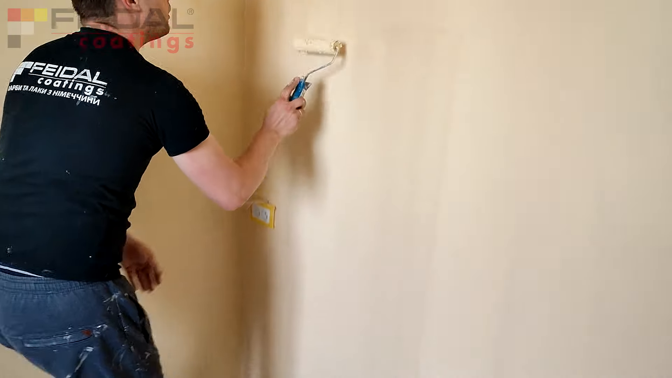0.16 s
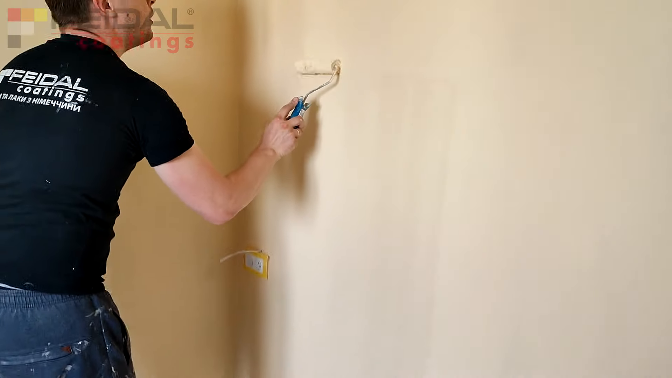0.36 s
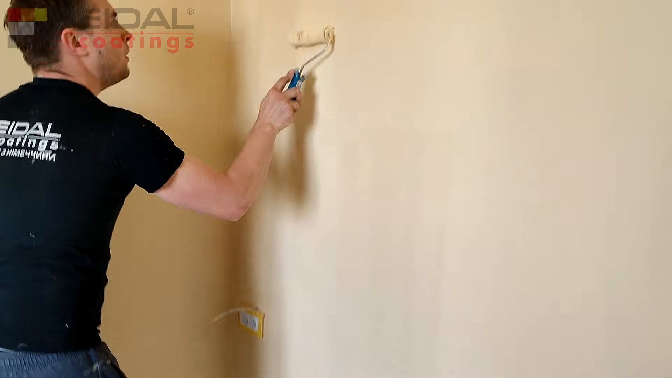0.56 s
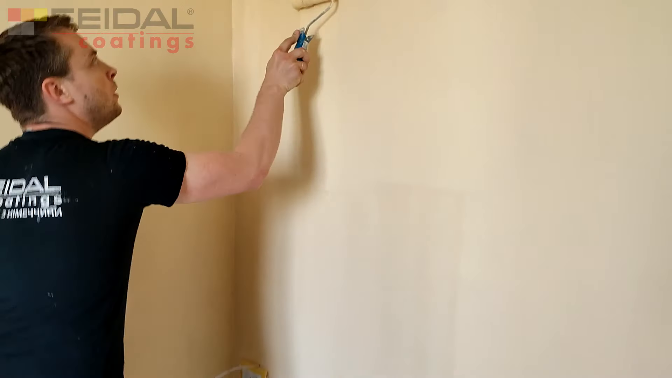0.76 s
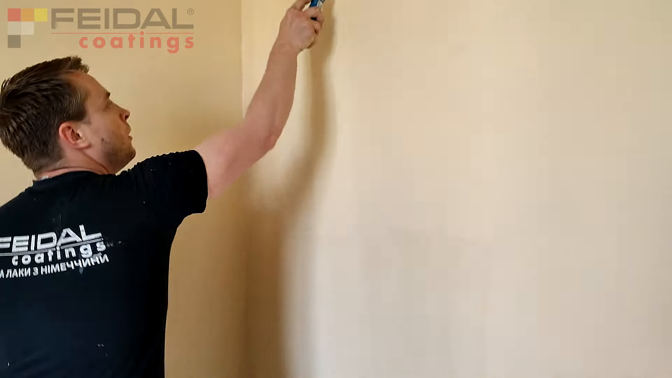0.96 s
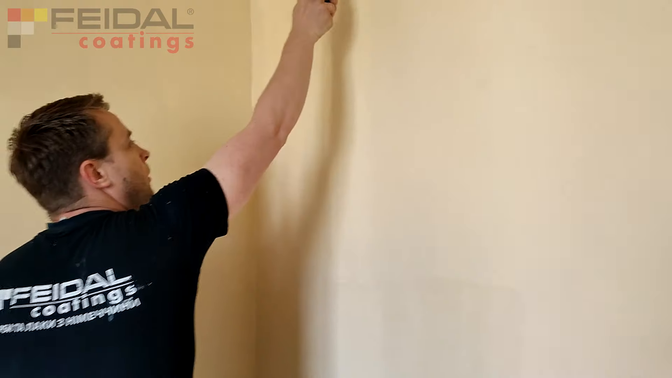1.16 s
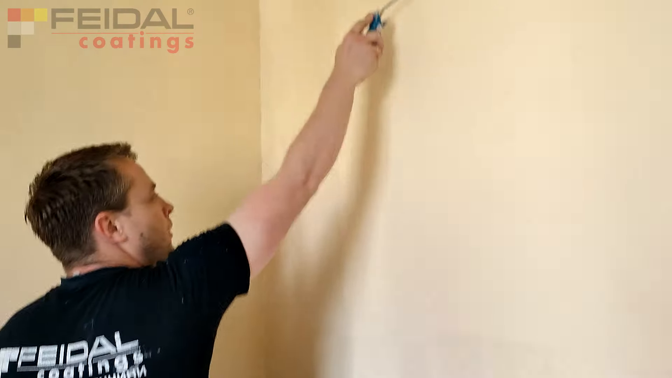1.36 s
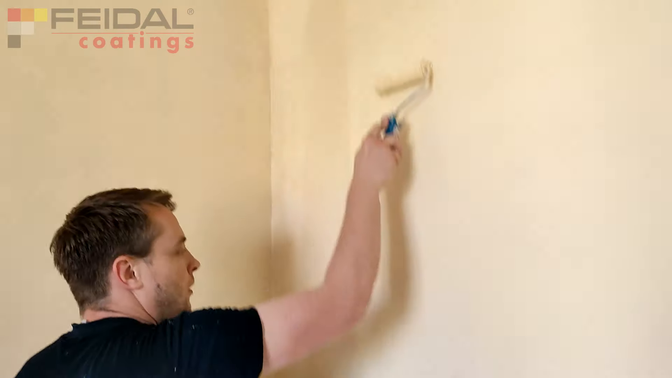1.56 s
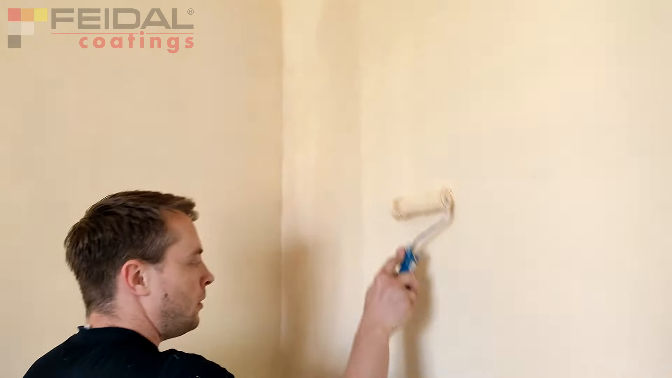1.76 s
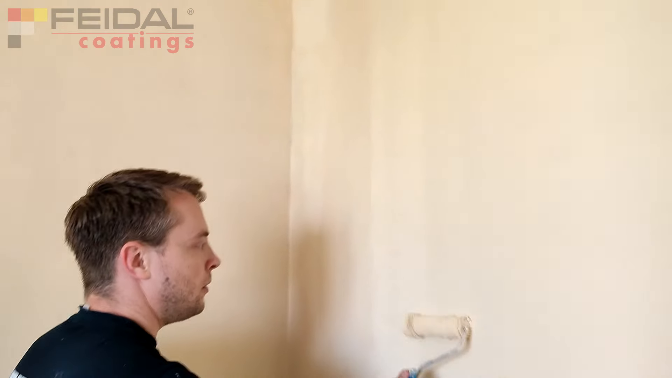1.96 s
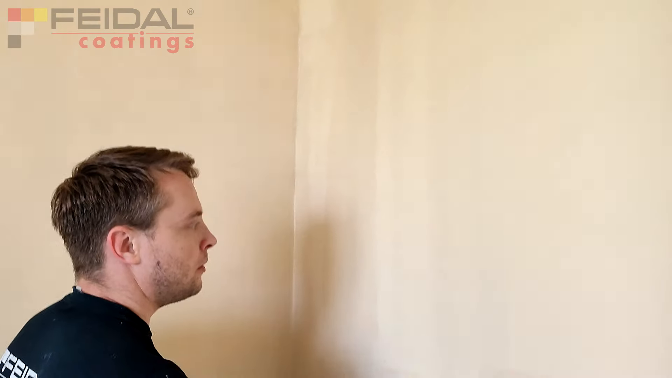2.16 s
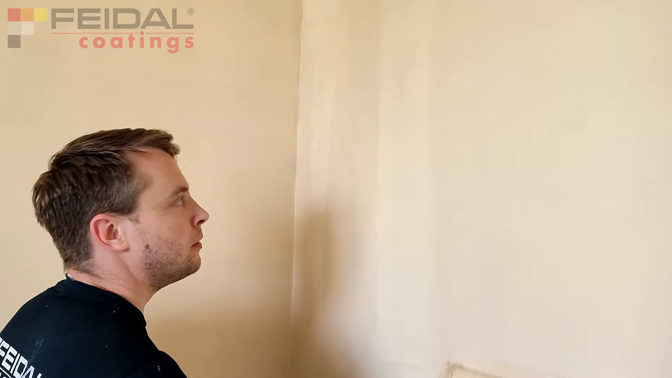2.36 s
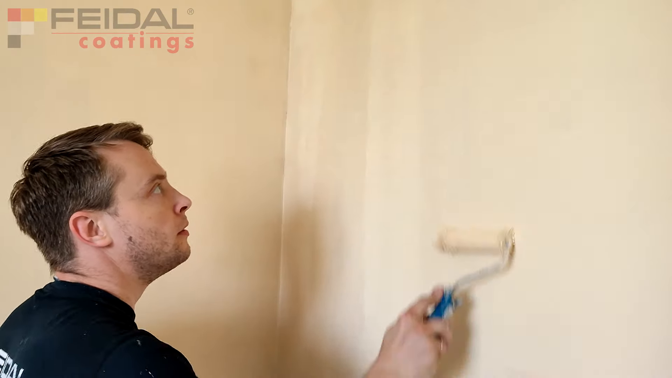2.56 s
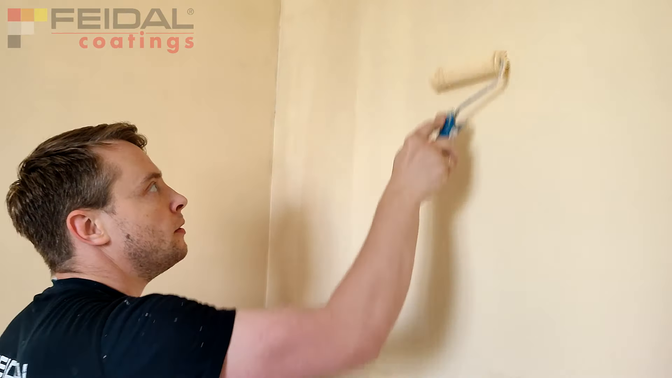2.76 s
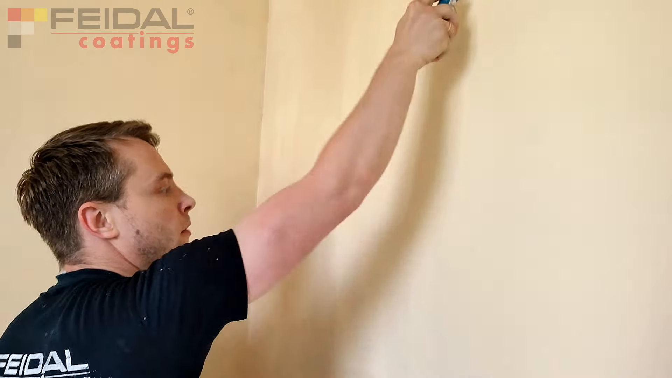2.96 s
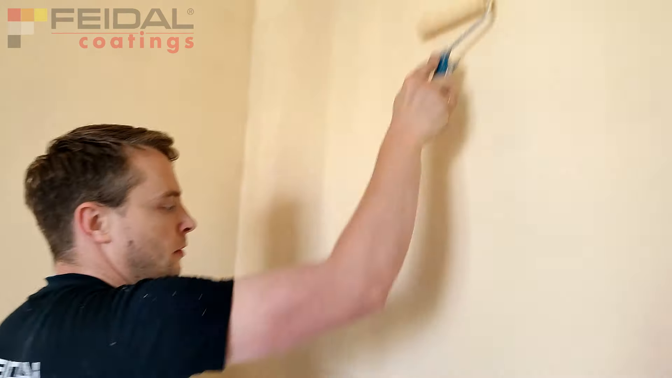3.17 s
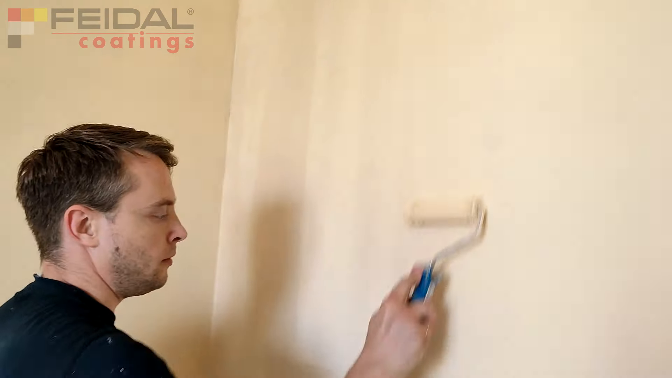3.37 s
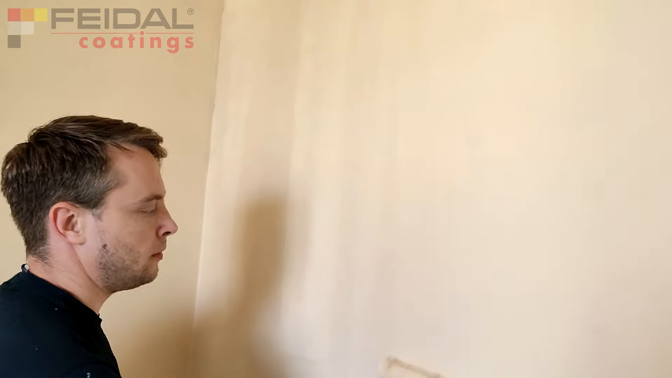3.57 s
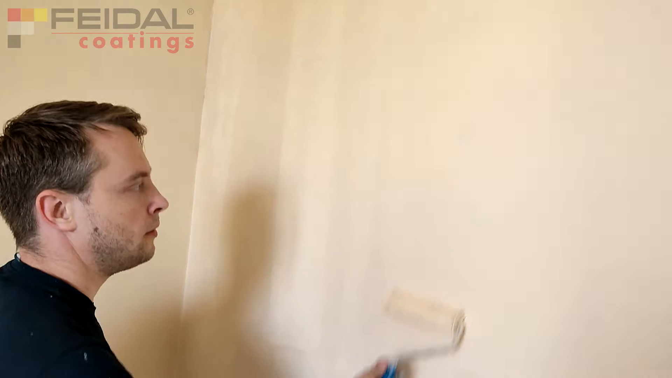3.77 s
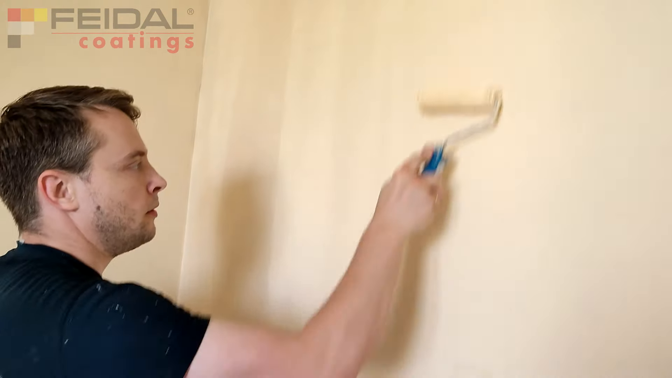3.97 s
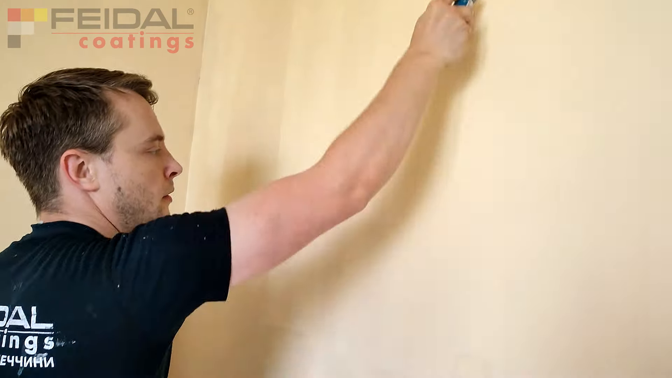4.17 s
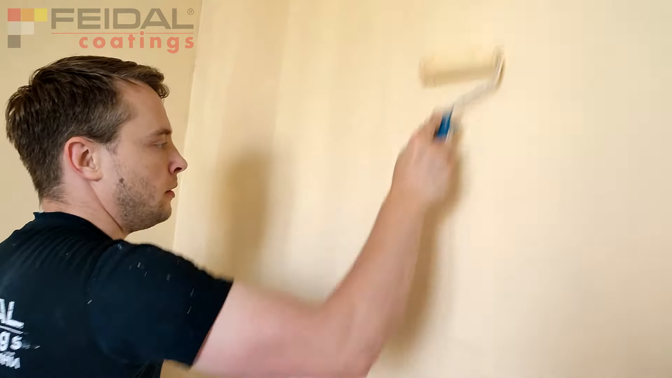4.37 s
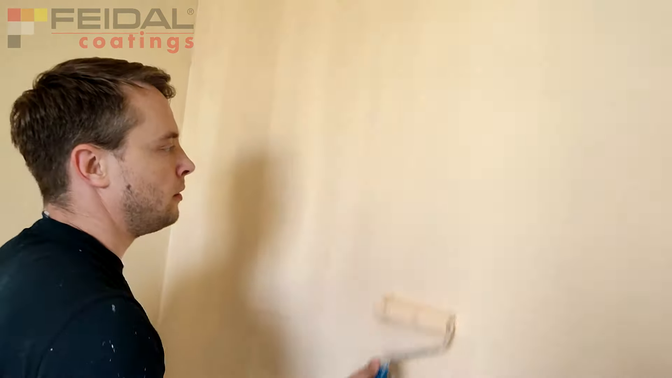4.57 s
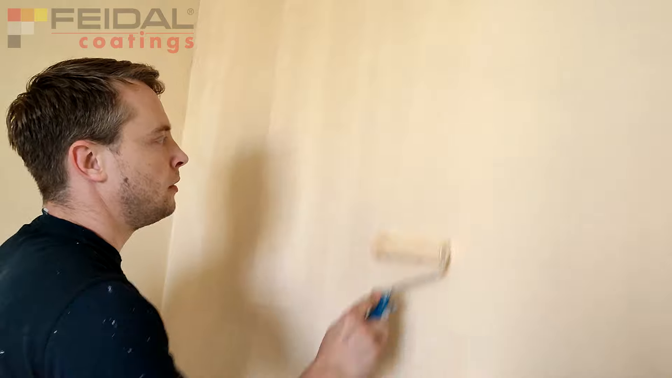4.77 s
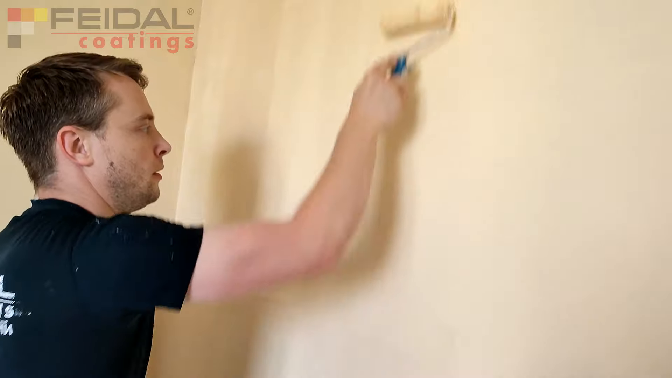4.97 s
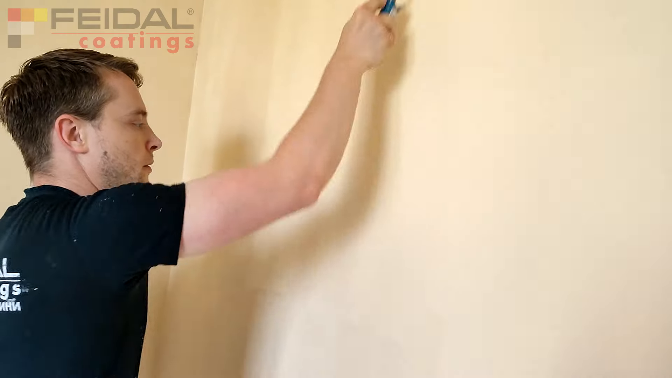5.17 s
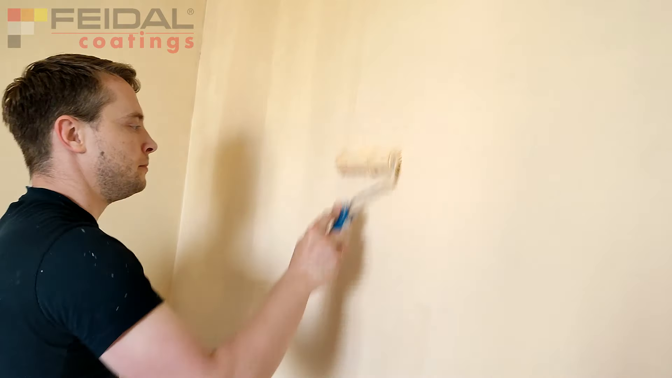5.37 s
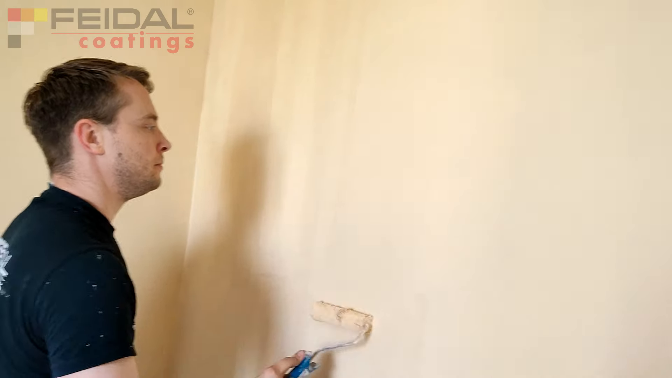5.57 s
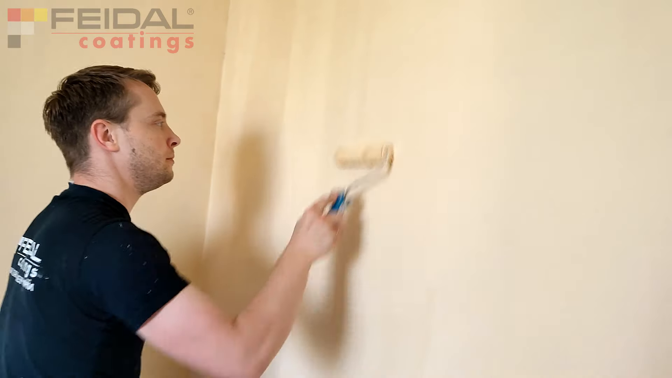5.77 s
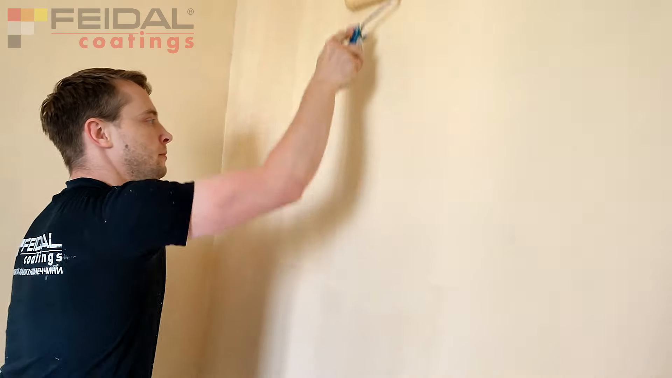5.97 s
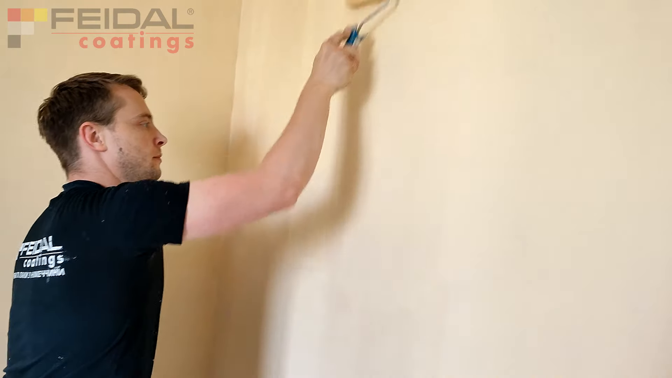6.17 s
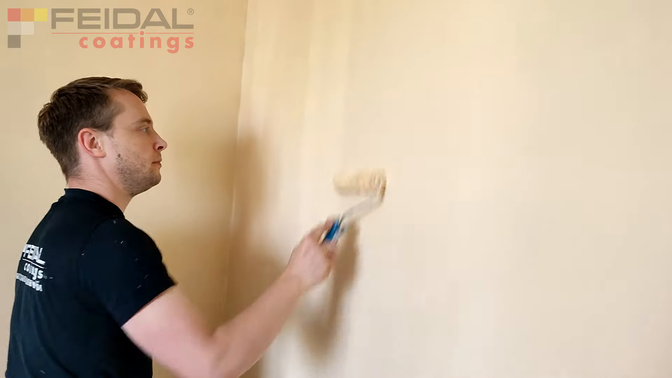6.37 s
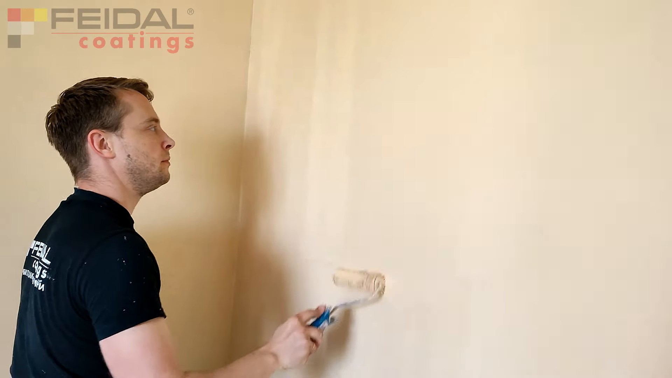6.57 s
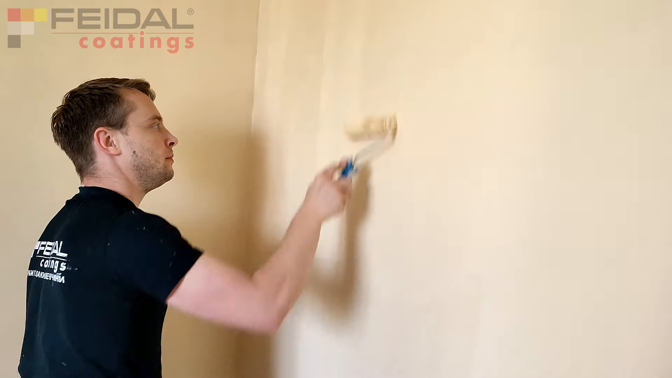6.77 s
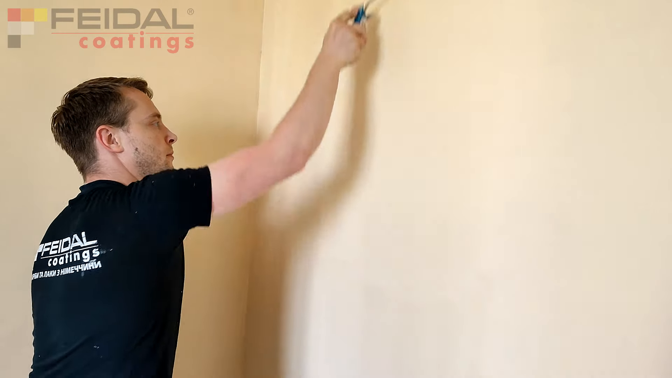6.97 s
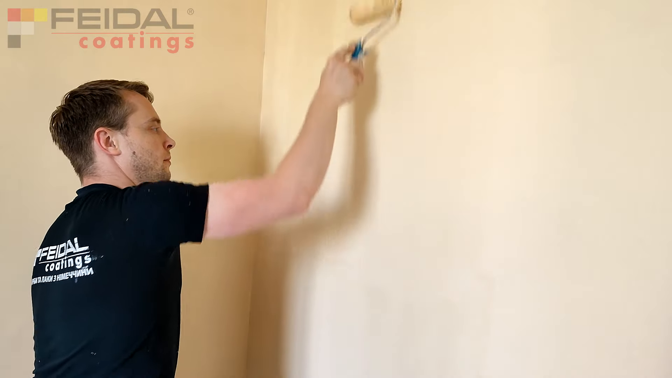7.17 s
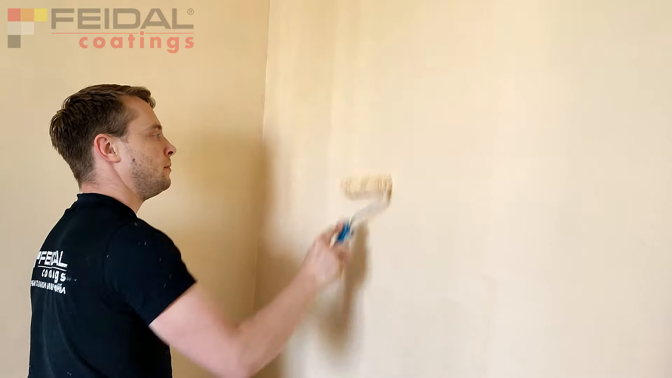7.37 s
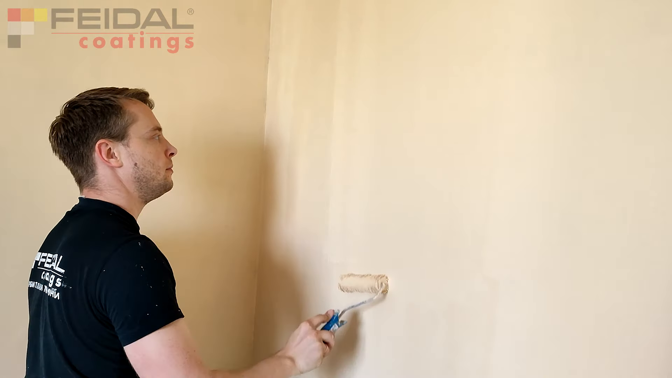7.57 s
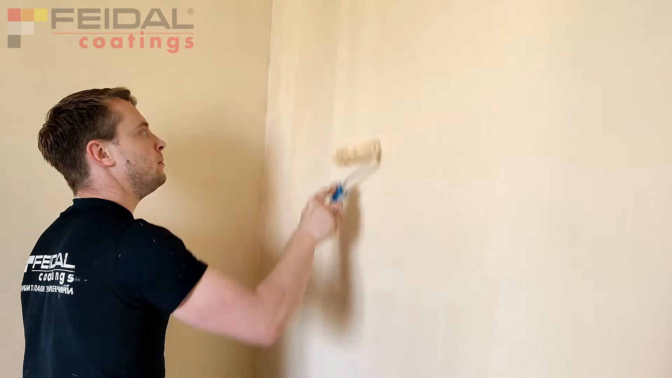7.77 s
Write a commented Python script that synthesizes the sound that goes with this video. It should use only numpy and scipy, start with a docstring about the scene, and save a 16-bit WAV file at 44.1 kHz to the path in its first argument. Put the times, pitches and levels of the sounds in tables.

```python
"""A small wet paint roller runs up and down a wall in a bare room, about two strokes a second.
Threads of paint snap behind the nap, and their impulses merge into a dense sticky hiss.
The lumpy sleeve drums softly on the wall, driving its low modes. The handle rattles, the painter's
shoes scuff the floor, and one sharp tick hits the right microphone, all over faint room air."""
import sys
import numpy as np
from scipy import signal
from scipy.fft import rfft, irfft, next_fast_len
from scipy.io import wavfile
from scipy.ndimage import uniform_filter1d, map_coordinates

SR = 44100
rng = np.random.default_rng(int(sys.argv[2]) if len(sys.argv) > 2 else 0)


def dump_mix(stems):
    """Bounce the given channels to the path in sys.argv[1] as a 16-bit WAV at rate SR."""
    frames = np.atleast_2d(stems).T  # one column per channel
    limited = np.clip(frames, -1, 1)  # hard clip at full scale
    pcm = np.round(limited * 32767).astype(np.int16)
    wavfile.write(sys.argv[1], SR, pcm)


N = 345303

# spectrum of snapping threads: f/Hz, left level/dB, right level/dB
THREAD_SPECTRUM = [(300, -25.5, -26), (1000, -17.5, -16), (1670, -21, -22.5), (2440, -10.5, -9),
                   (3280, -11, -7), (4670, -12, -5), (5980, -12.5, -3), (7000, -6, 1.5), (7710, -11, -1),
                   (8220, -5, -25), (8650, -9.5, -11.5), (9700, -18, -6.0), (12500, -11.5, -3),
                   (16800, -13.5, -9.5)]
# spectrum of the squelch: f/Hz, level/dB
BEAD_SPECTRUM = [(300, -6), (700, -10), (1050, -17.5), (1500, -4.5), (2100, -3), (3100, -2), (4300, -6.5),
                 (7000, -7.5), (14000, -40)]
# drift of the hiss above 9 kHz: t/s, gain/dB
TREBLE_DRIFT = [(0, -0.5), (1.8, 0), (3.4, 2.5), (5.5, -0.5), (6.8, -1.5), (7.8, -0.5)]
LANDING_S, BEFORE_LANDING_DB = .295, -7  # the paint is fainter until the roller lands

def paint():
    """Shot noise: threads snap as the nap lifts off, and a faster roller breaks more of them."""
    _, _, hiss_db, *_ = np.transpose(STROKES)
    peel = rolling(hiss_db, speed_power=1, creep_db=-68)
    squelch = rolling(hiss_db - 9, speed_power=1.38, creep_db=-57.5)
    contact_db = BEFORE_LANDING_DB * (np.arange(N) / SR < LANDING_S)
    treble_db = np.interp(np.arange(N) / SR, *np.transpose(TREBLE_DRIFT))
    speed = peel / peel.max()
    nap_db = 0.6 * wobble(25) + 0.18 * wobble(160)  # the nap is loaded unevenly
    threads = impulses(30000 * speed + 6000, scatter_db=1.2)
    spectrum = np.array(THREAD_SPECTRUM)
    left, right = spectrum[:, [0, 1]], spectrum[:, [0, 2]]
    hiss = unit(filtered(threads, lambda hz: amp([along(left, hz), along(right, hz)])))
    treble = filtered(hiss, lambda hz: 1 - 1 / (1 + (hz / 9000) ** 6))
    hiss += (amp(treble_db) - 1) * treble
    # thicker beads of paint part with a lower smack
    beads = spread(impulses(12000 * speed + 3000, scatter_db=1.5))
    smack = panned(coloured(beads, BEAD_SPECTRUM), right_db=6)
    return amp(contact_db + nap_db) * (amp(3.5) * peel * hiss + amp(-2) * squelch * smack)


# passes of the roller, levels relative: start t/s, end t/s, hiss level/dB, boom level/dB,
# rumble level/dB, arch exponent (1 = a sine arch, more = more peaked)
STROKES = [(0.217, 1.31, -46, -60, -61, 1.27), (1.269, 2.387, -42.5, -60.5, -56, 2),
           (2.321, 3.067, -44, -60, -58.5, 0.63), (2.998, 3.763, -42, -58, -60, 1.09),
           (3.615, 4.288, -42.5, -65, -57, 1.12), (4.189, 4.75, -38.5, -48.5, -55.5, 1.42),
           (4.616, 5.184, -39, -51.5, -54, 1.24), (5.086, 5.693, -39, -44, -51.5, 1.27),
           (5.562, 6.19, -39.4, -47, -52, 0.92), (6.101, 6.681, -38.5, -46.5, -55.5, 1.3),
           (6.542, 7.17, -38.5, -48.5, -55.5, 1.27), (7.078, 7.69, -38, -45.5, -58.5, 1.31),
           (7.554, 8.166, -39, -44.5, -59.5, 1.13)]

def rolling(levels_db, speed_power, creep_db, lag_s=0):
    """Incoherent addition: arched strokes and a steady creep sum in power to give one envelope."""
    t = np.arange(N) / SR - lag_s
    power = np.full(N, amp(creep_db) ** 2)
    for (start, end, *_, arch), db in zip(STROKES, levels_db):
        during = slice(*np.searchsorted(t, [start, end]))
        speed = np.abs(np.sin(np.pi * (t[during] - start) / (end - start))) ** arch
        power[during] += (amp(db) * speed ** speed_power) ** 2
    return np.sqrt(power)


# low modes of the wall: f/Hz, bandwidth/Hz, relative level/dB
WALL_MODES = [(51, 3.9, -0.5), (91.4, 6, 0.5), (107.4, 7.2, -6.5), (131.3, 4.4, -4)]
# resonances under the sleeve: f/Hz, bandwidth/Hz, relative level/dB
RUMBLE_MODES = [(158.8, 10.4, 5), (203, 9.5, 3), (239.7, 37, 1), (279.9, 10.8, 4), (308.4, 11, 5.5),
                (347.5, 10, 4.5), (398, 35, -4), (487, 34, -14), (670, 58, -6.5)]

def wall():
    """Forced vibration: lumps in the sleeve knock on the wall, which booms under a lighter rumble."""
    _, _, _, boom_db, rumble_db, _ = np.transpose(STROKES)
    pressure = rolling(boom_db, speed_power=0.86, creep_db=-63, lag_s=.035)
    turning = rolling(rumble_db, speed_power=0.61, creep_db=-65)
    # f/Hz, level/dB
    boom_spectrum = [(25, -6), (50, 5), (68, -12), (88, 1), (135, -3), (165, -18.5), (260, 0), (800, -51)]
    rumble_spectrum = [(70, -6), (150, -2.5), (200, 1.5), (750, 1), (1100, 0), (5000, -17)]
    boom = resonant(spread(impulses(900, scatter_db=2.5)), WALL_MODES)
    boom = evened(coloured(boom, boom_spectrum))
    rumble = resonant(spread(impulses(1500, scatter_db=2)), RUMBLE_MODES)
    return pressure * boom + turning * coloured(rumble, rumble_spectrum)


# resonance of the hollow-sounding patches: f/Hz, bandwidth/Hz, relative level/dB
PATCH_MODE = [(142, 12, 0)]
# the roller crossing a patch: centre t/s, half duration/s, level/dB
CROSSINGS = [(2.518, 0.26, -57), (7.473, 0.19, -50)]

def patches():
    """Local resonance: patches of the wall drone at a higher note as the sleeve drums over them."""
    t = np.arange(N) / SR
    nearness = sum(amp(db) * np.exp(-((t - s) / half_s) ** 2) for s, half_s, db in CROSSINGS)
    knocks = spread(impulses(900, scatter_db=0))
    return nearness * evened(resonant(knocks, PATCH_MODE))


# the roller landing or jolting: t/s, chatter level/dB, chatter T60/s, thud level/dB
JOLTS = [(.295, -58, 0.27, -48.5), (1.07, -53, 0.88, -64.5), (1.373, -59, 0.35, -51),
         (2.349, -53, 0.13, -50), (2.955, -42.5, 0.24, -76)]
# spectrum of the chatter: f/Hz, level/dB
FRAME_SPECTRUM = [(300, -14), (900, -5), (1800, 10), (4000, 7), (7000, -6), (14000, -12)]

def handle():
    """Impact noise: after each jolt the sleeve chatters briefly on its wire frame."""
    shake = sum(amp(db) * burst(s, 0.0024, t60) for s, db, t60, _ in JOLTS)
    impacts = spread(impulses(4000, scatter_db=1.5))
    return shake * panned(coloured(impacts, FRAME_SPECTRUM), right_db=6.5)


# wall modes shaken by a jolt: f/Hz, T60/s, relative level/dB
THUD_MODES = [(52, 0.65, -5), (92.3, 0.51, 0.5), (132, 0.8, -5.5), (149, 0.57, -3), (212, .15, -22)]

def thuds():
    """Damped free vibration: each jolt pushes the wall, which rings low and slightly unsteadily."""
    t = np.arange(N) / SR
    out = np.zeros(N)
    for hz, t60, mode_db in THUD_MODES:
        ring = sum(amp(db + mode_db) * burst(s, 0.019, t60) for s, _, _, db in JOLTS)
        out += ring * np.sin(2 * np.pi * hz * t + 1.1 * wobble(30))
    return out


# scuffs on the floor: t/s, level/dB, rise time/s, T60/s
SCUFFS = [(.714, -39.5, 0.0024, 0.26), (.745, -46, 0.037, 0.78), (1.055, -48.5, 0.029, 0.43),
          (1.325, -55, 0.022, 1), (1.359, -48, 0.0015, 0.018), (5.84, -45.5, 0.019, 0.46)]
# spectrum of a scuff: f/Hz, level/dB
SOLE_SPECTRUM = [(100, -21), (250, -13), (340, 0), (450, -1.5), (740, 3.5), (950, -2.5), (1400, -8),
                 (2300, -10.5), (5000, -24), (12000, -46)]

def shoes():
    """Friction noise: soles catch and slide over the gritty floor."""
    slide = sum(amp(db) * burst(s, rise, t60) for s, db, rise, t60 in SCUFFS)
    grit = spread(impulses(9000, scatter_db=0))
    return slide * coloured(grit, SOLE_SPECTRUM)


TICK_S, TICK_DB = 6.3215, -9.4

def tick():
    """A pressure transient on the right microphone: a spike, then a millisecond's flat push back."""
    spike_s, delay_s, push_s, leak_hz = .00004, .00065, .00047, 55
    t = np.arange(N) / SR - TICK_S
    spike = np.exp(-(t / spike_s) ** 2)
    push = .54 * np.exp(-((t - delay_s) / push_s) ** 10)
    blow = filtered(push - spike, lambda hz: 1j * hz / (leak_hz + 1j * hz))
    return np.outer([0, 1], amp(TICK_DB) * blow)


# reverberation time of the bare room: f/Hz, T60/s
ROOM_DECAY = [(150, 0.83), (1500, 1), (6000, 0.45), (14000, 0.037)]

def room(x, wet_db, positions=24):
    """Reverberation: the tail keeps changing as the source moves, and its treble dies first."""
    out = x.copy()
    place = np.arange(N) / N * (positions - 1)
    for k in range(positions):
        hz, t, noise = signal.stft(rng.standard_normal((2, SR // 2)), SR, nperseg=256)
        decay = np.exp(-np.log(1000) * t / along(ROOM_DECAY, hz)[:, None])
        tail = signal.istft(noise * decay, SR)[1]
        near = np.flatnonzero(np.abs(place - k) < 1)
        piece = x[:, near] * np.sqrt(1 - np.abs(place[near] - k))  # equal-power crossfade
        echo = signal.fftconvolve(piece, tail / np.linalg.norm(tail[0]), axes=1)[:, :N - near[0]]
        out[:, near[0]:near[0] + echo.shape[1]] += amp(wet_db) * echo
    return out


# spectrum of the still room: f/Hz, relative level/dB
AIR_SPECTRUM = [(20, 5.5), (45, -4), (100, -7.5), (240, -6.5), (400, -44), (900, -16), (2000, -15),
                (6000, -40.5), (15000, -46)]

def air():
    """Stationary noise: the room's still air, strongest in the bass."""
    return amp(-60) * coloured(spread(rng.standard_normal((2, N))), AIR_SPECTRUM)


# likeness of left and right: f/Hz, coherence
COHERENCE = [(130, 0.93), (290, 0.95), (640, 0.75), (1400, 0)]

def spread(pair):
    """Spatial coherence: two independent signals become alike in the bass, unrelated in the treble."""
    angle = lambda hz: np.arccos(np.clip(along(COHERENCE, hz), -1, 1)) / 2
    mid, side = filtered(pair, lambda hz: np.array([np.cos(angle(hz)), np.sin(angle(hz))]))
    return np.array([mid + side, mid - side])


def panned(x, right_db):
    """A level difference leans a pair towards the right."""
    return x * amp([[-right_db / 2], [right_db / 2]])


def impulses(per_second, scatter_db):
    """A random point process: two trains of impulses of random size, with steady power."""
    chance = np.clip(per_second / SR, 1e-4, 1)
    sizes = rng.standard_normal((2, N)) * amp(scatter_db * rng.standard_normal((2, N)))
    return unit(sizes * (rng.random((2, N)) < chance) / np.sqrt(chance))


def burst(start_s, rise_s, t60):
    """An envelope of linear rise and exponential decay."""
    t = np.maximum(np.arange(N) / SR - start_s, 0)
    return np.minimum(t / rise_s, 1) * np.exp(-np.log(1000) * np.maximum(t - rise_s, 0) / t60)


def wobble(rate):
    """Smooth random modulation, rate knots a second."""
    knots = rng.standard_normal(int(N * rate / SR) + 4)
    return map_coordinates(knots, [np.arange(N) * rate / SR])


def evened(x):
    """Compression: the hand's steady push evens out the drumming; rms 1."""
    power = uniform_filter1d(np.mean(x ** 2, axis=0), size=4000)
    return unit(x / np.sqrt(np.abs(power) + .1))


def resonant(x, modes):
    """Modal superposition: x through (f/Hz, bandwidth/Hz, level/dB) resonators, at rms 1."""
    def response(f):
        return sum(amp(db) * 1j * f * width / (f0 * f0 - f * f + 1j * f * width)
                   for f0, width, db in modes)
    return unit(filtered(x, response))


def coloured(x, points):
    """Spectral shaping by (f/Hz, level/dB) points, at rms 1."""
    return unit(filtered(x, lambda hz: amp(along(points, hz))))


def filtered(x, response):
    """Linear filtering: the spectrum of x times a complex frequency response."""
    size = next_fast_len(N + SR // 2)
    return irfft(rfft(x, size) * response(np.fft.rfftfreq(size, 1 / SR)), size)[..., :N]


def along(points, hz):
    """Interpolation of (f/Hz, value) points on a log axis."""
    f, values = np.transpose(points)
    return np.interp(np.log(hz + 1), np.log(f + 1), values)


def unit(x):
    """Normalisation to rms 1."""
    return x / np.sqrt(np.mean(x ** 2) + 1e-20)


def amp(db):
    """Decibels to amplitude ratio."""
    return 10 ** (np.asarray(db) / 20)


def scene():
    """Superposition: paint, handle and shoes reverberate; the wall, tick and air add directly."""
    background = air()
    reverberant = room(paint() + handle() + shoes(), wet_db=-8)
    return reverberant + wall() + patches() + thuds() + tick() + background


CUTOFF_HZ = 15520

def record(dry):
    """Band limiting: an ideal low-pass filter removes the highest treble."""
    return filtered(dry, lambda hz: hz < CUTOFF_HZ)


dry = scene()
out = record(dry)
dump_mix(out)
```